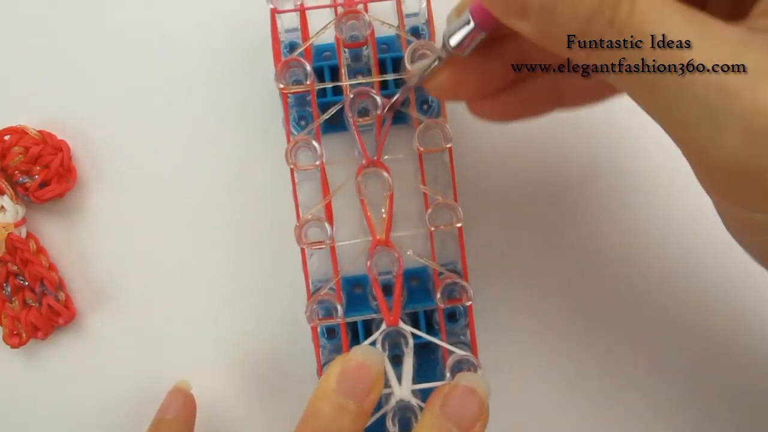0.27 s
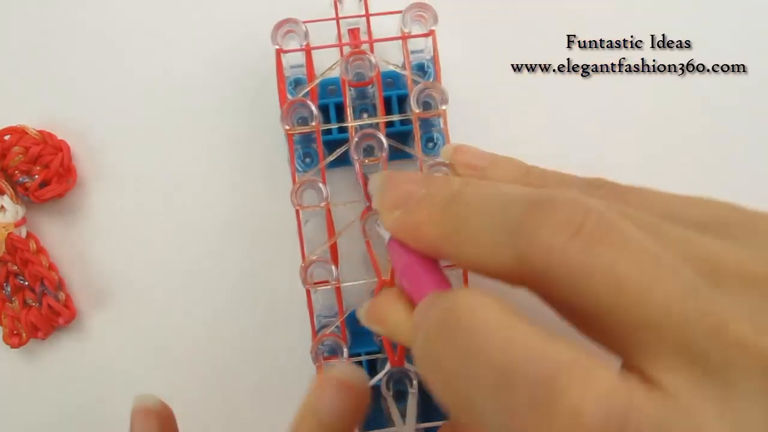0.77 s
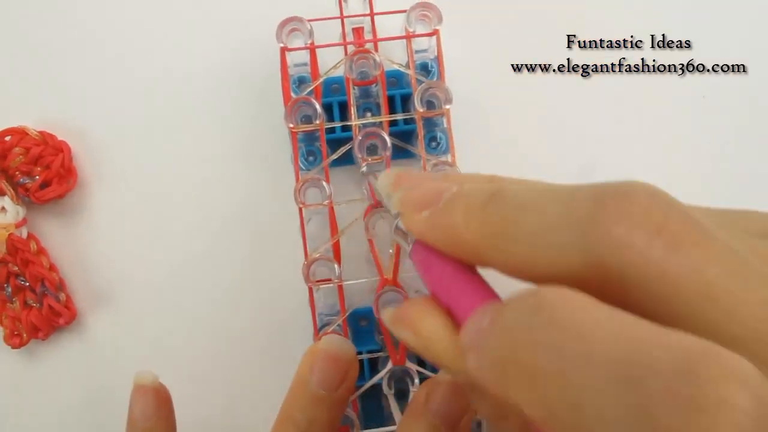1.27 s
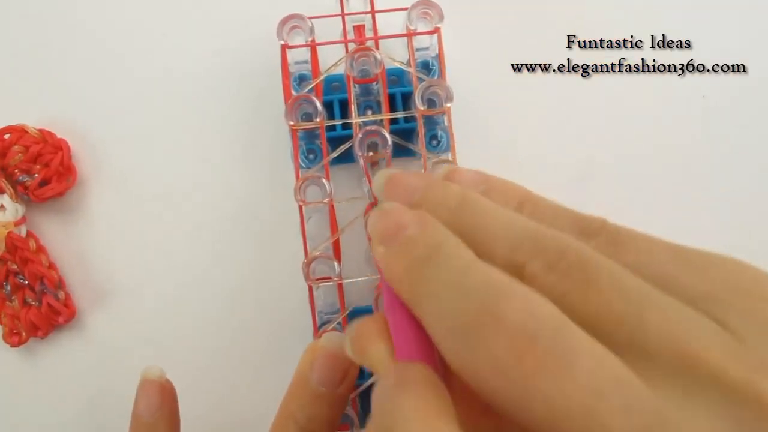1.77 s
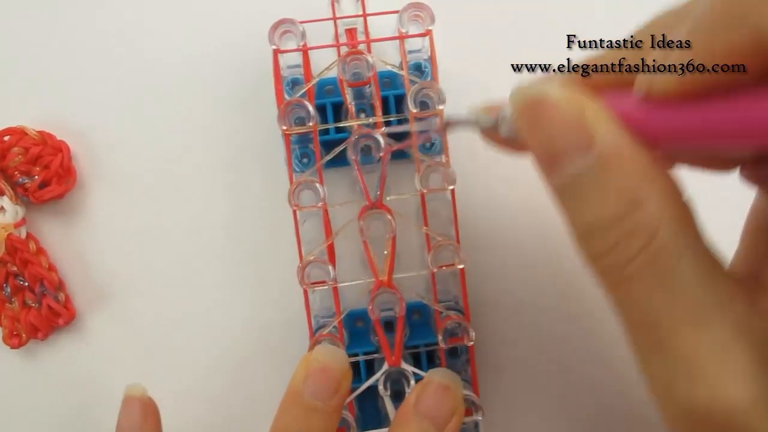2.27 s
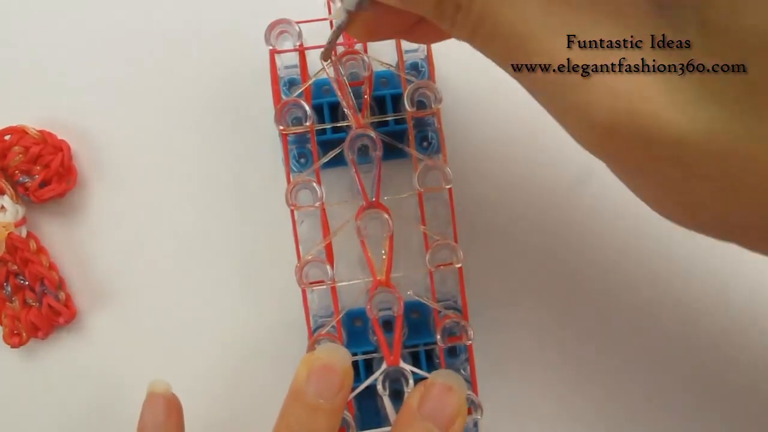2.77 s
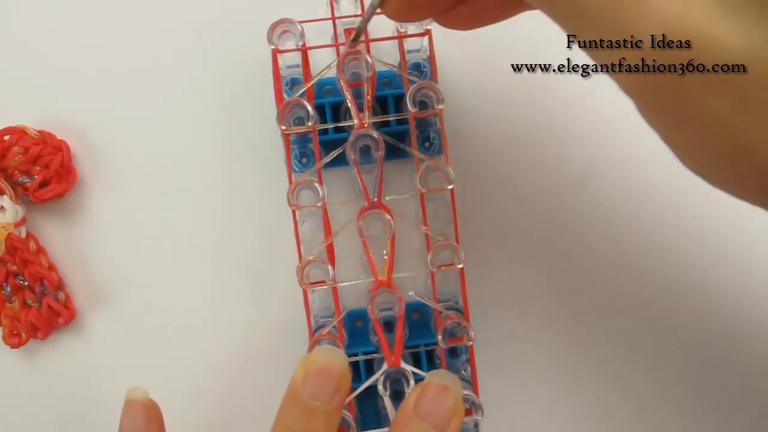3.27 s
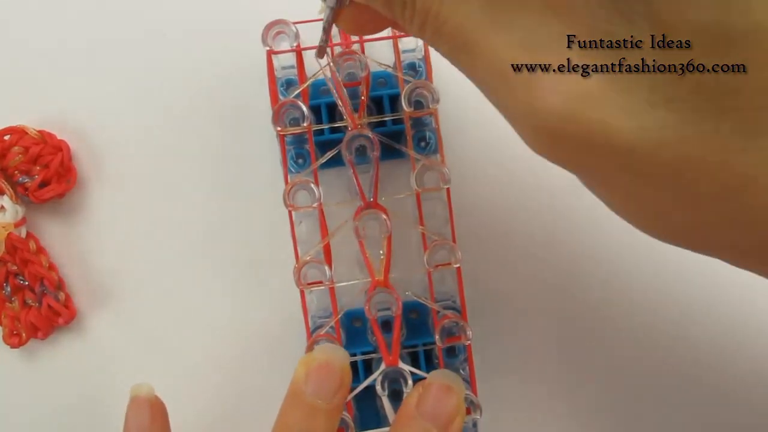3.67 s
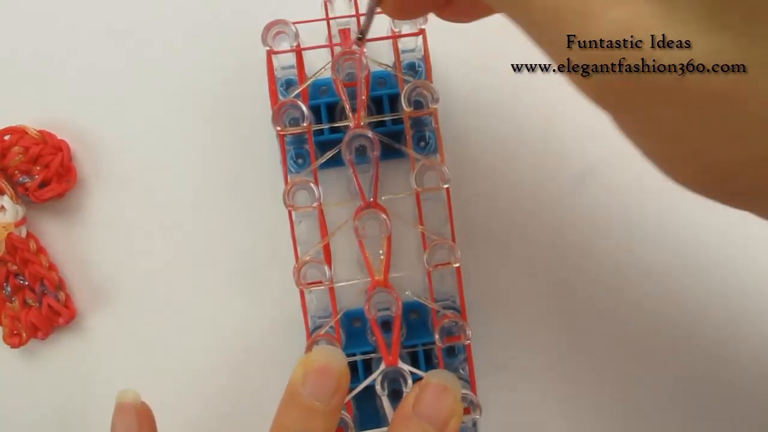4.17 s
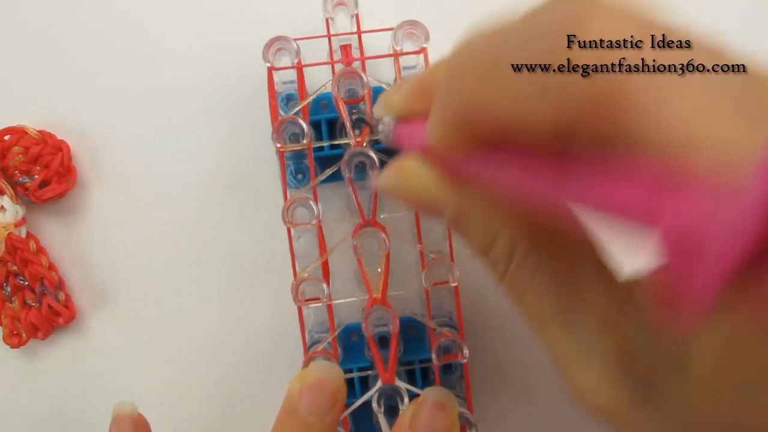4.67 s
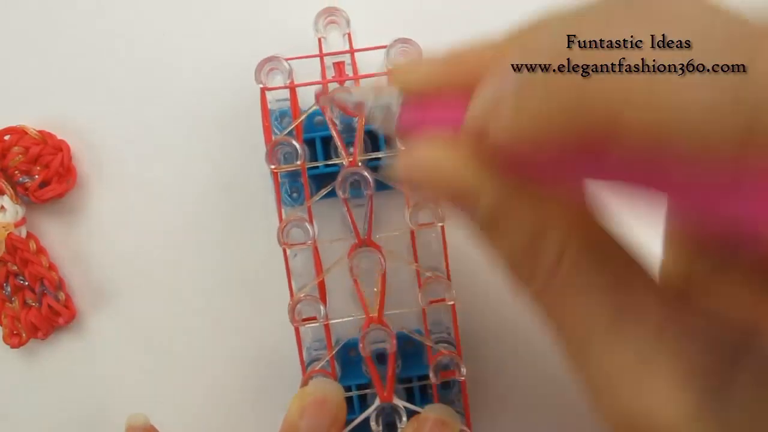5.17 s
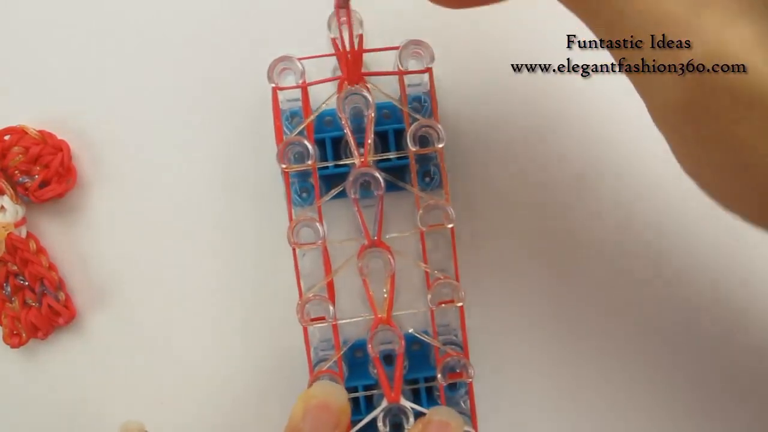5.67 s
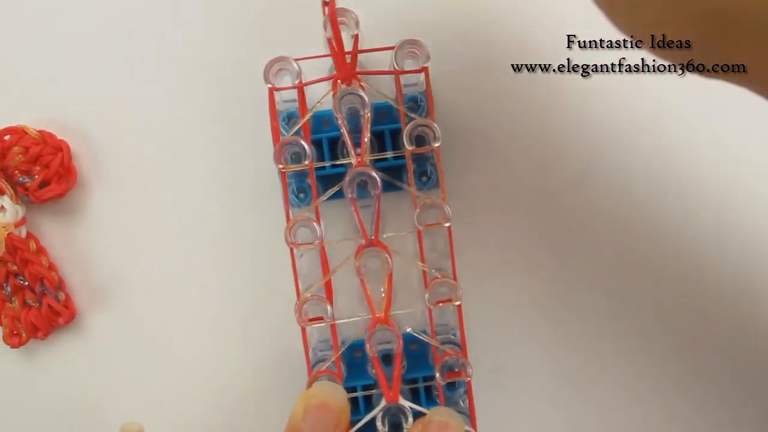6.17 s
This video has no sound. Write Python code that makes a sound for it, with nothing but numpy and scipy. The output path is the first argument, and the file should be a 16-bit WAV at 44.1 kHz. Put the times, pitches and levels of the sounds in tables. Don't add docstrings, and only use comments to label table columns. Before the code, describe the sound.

Sparse plastic clicks, faint rubber rubs and one piercing close tick over a quiet indoor hum, ending with a hard hollow snap.

```python
import sys
import numpy as np
from scipy import signal
from scipy.io import wavfile

SR = 44100
rng = np.random.default_rng(int(sys.argv[2]) if len(sys.argv) > 2 else 0)


def output_pcm(signal):
    pcm = np.clip(np.atleast_2d(signal).T, -1, 1) * 32767
    wavfile.write(sys.argv[1], SR, np.round(pcm).astype(np.int16))


def decibels_to_gain(level_db):
    exponent = np.asarray(level_db, float) / 20
    return 10 ** exponent


N = 283695
T = np.arange(N) / SR

# frequency in Hz, width in Hz, level in dB.
PEG_RINGS = [(2294, 2750, -9.5), (3377, 347, -0.5), (4556, 750, -6), (5100, 950, -1), (5580, 786, -1),
             (7017, 975, 3.5), (7220, 1580, 2), (10630, 4860, -10.5), (14190, 3400, -8)]
TICK_S = 1.0894


def rms_one(x):
    return x / np.sqrt(np.mean(x ** 2) + 1e-20)


def at_hz(points, hz):
    table_hz, values = np.array(points).T
    return np.interp(np.log(hz), np.log(table_hz), values)


def resonate(x, hz, width_hz):
    r = np.exp(-np.pi * width_hz / SR)
    poles = [1, -2 * r * np.cos(2 * np.pi * hz / SR), r * r]
    return signal.lfilter([(1 - r * r) / 2, 0, (r * r - 1) / 2], poles, x)


def butter(x, order, hz, kind="low"):
    return signal.sosfilt(signal.butter(order, hz, kind, fs=SR, output="sos"), x)


def sides(db):
    return decibels_to_gain(np.array([[db / 2], [-db / 2]]))


def add(out, s, sound):
    i = round(s * SR)
    out[..., i:i + sound.shape[-1]] += sound[..., :N - i]


def noise_bands(length):
    white = rng.standard_normal((2, 2, length))
    edges = np.geomspace(16, 17000, 25)
    for k in range(24):
        yield np.sqrt(edges[k] * edges[k + 1]), butter(white[k % 2], 2, edges[k:k + 2], "band")


def stereo(pair, hz):
    # frequency in Hz, left-right likeness from 0 to 1.
    likeness = [(60, 0.84), (180, 0.92), (550, 0.67), (1650, 0.4), (4970, 0.017), (15000, 0.057)]
    # frequency in Hz, left-right difference in dB.
    tilt = [(60, -4), (180, 1.5), (550, 1.5), (1650, 2.5), (4970, 1.5), (15000, -3)]
    alike = np.clip(at_hz(likeness, hz), 0, 1)
    mid = np.sqrt(1 + alike) * pair[0]
    side = np.sqrt(1 - alike) * pair[1]
    return sides(at_hz(tilt, hz)) * (mid + side * [[1], [-1]])


def gain_db(t):
    # start in seconds, depth in dB.
    ducks = [
        (.112, 3),
        (.244, 3),
        (1.091, 34),
        (2.2, 1.5),
        (3.444, 0.76),
        (5.408, 7.5),
        (6.082, 0.95),
    ]
    rest_db, grab_s, settle_s, grab_share, release_s = 1, 0.0085, .05, 0.4, 0.65
    out = rest_db
    for s, depth_db in ducks:
        since = np.maximum(t - s, 0)
        fast = grab_share * np.exp(-since / grab_s)
        slow = (1 - grab_share) * np.exp(-since / settle_s)
        out = out - depth_db * (1 - fast - slow) * np.exp(-since / release_s)
    return out


def ports(x):
    # cavity resonance in Hz, its width in Hz, mesh cutoff in Hz.
    cavities = [(5250, 890, 4600), (7165, 2950, 7670)]
    out = []
    for side, (hz, width_hz, cut_hz) in zip(x, cavities):
        r = np.exp(-np.pi * width_hz / SR)
        poles = [1, -2 * r * np.cos(2 * np.pi * hz / SR), r * r]
        cavity = signal.lfilter([sum(poles)], poles, side)
        out.append(butter(cavity, 2, min(cut_hz, 20000)))
    return np.array(out)


def air():
    # frequency in Hz, density in dB per Hz.
    spectrum = [(15, -31), (22, 0), (56, -5), (72, -16.5), (150, -16.5), (260, -17.5), (446, -27),
                (1060, -30), (2910, -35.5), (5000, -37), (9140, -41.5), (12500, -45.5), (14500, -55.5),
                (16000, -53)]
    # frequency in Hz, rms level in dB, wavering share, left-right in dB.
    hum_lines = [(28.1, -60, .9, -4), (56.8, -59, .9, -4), (119.95, -54, .1, 2), (239.9, -64, .2, 3),
                 (8799.2, -80, .05, -9)]
    air_db = -49
    beat_hz, beat_db, lull_s = 121.98, -58.5, .53
    noise = sum(decibels_to_gain(at_hz(spectrum, hz)) * stereo(pair, hz) for hz, pair in noise_bands(N))
    out = decibels_to_gain(air_db) * rms_one(noise)
    for hz, level_db, share, pan_db in hum_lines:
        waver = rms_one(resonate(rng.standard_normal(N + SR), hz, 3.0)[SR:])
        steady = np.sqrt(2) * np.cos(2 * np.pi * hz * (T - lull_s))
        out += decibels_to_gain(level_db) * (steady + share * waver) * sides(pan_db)
    return out - decibels_to_gain(beat_db) * np.sqrt(2) * np.cos(2 * np.pi * beat_hz * (T - lull_s))


def room(x):
    # frequency in Hz, decay by 60 dB in seconds.
    decay = [(500, 0.93), (1500, 0.074), (3400, .5), (5300, 0.42), (9000, 0.75), (15000, .1)]
    # frequency in Hz, level in dB.
    colour = [(400, -2.5), (1100, -5), (2300, -8.5), (3400, 4), (4200, 0.5), (5200, -3.5), (7500, -2),
              (12000, -10.5)]
    t = np.arange(SR // 2) / SR
    tail = 0
    for hz, pair in noise_bands(len(t)):
        tail = tail + decibels_to_gain(at_hz(colour, hz) - 60 * t / at_hz(decay, hz)) * stereo(pair, hz)
    tail = tail * (1 - np.exp(-t / .004))
    tail = tail / np.sqrt(np.sum(tail ** 2) / 2)
    return signal.fftconvolve(x[None], tail, axes=1)[:, :N]


def tick():
    # frequency in Hz, level in dB, decay by 60 dB in seconds.
    housing = [(3095, -12, .062), (2100, -18, .025), (2126, -30, .19), (3262, -42, .29), (3232, -47, .25),
               (2611, -66, .8), (4480, -37, .07), (5210, -47, .3), (6525, -47, .14)]
    tick_hz, tick_db, width_s, far_db = 3480, -2.5, .00047, -30.5
    out = np.zeros((2, N))
    t = np.arange(SR // 2) / SR - .002
    burst = decibels_to_gain(tick_db) * np.exp(-.5 * (t / width_s) ** 2)
    grit = decibels_to_gain(-29.5) * rng.standard_normal(len(t))
    edge = decibels_to_gain(-27) * np.cos(2 * np.pi * 10500 * t)
    snap = burst * (np.cos(2 * np.pi * tick_hz * t) + grit + edge)
    rise = np.clip(t / .0015, 0, 1) ** 2
    modes = sum(decibels_to_gain(db - 60 * t / t60) * np.sin(2 * np.pi * hz * t) for hz, db, t60 in housing)
    ring = snap + rise * modes
    scatter = rng.standard_normal(300) * np.exp(-np.arange(300) / 410.0)
    far = signal.fftconvolve(ring, scatter)[:len(t)]
    add(out, TICK_S - .002, np.array([ring, decibels_to_gain(far_db) * far / np.abs(far).max()]))
    return out / decibels_to_gain(gain_db(T))


def rubs():
    # time in seconds, level in dB, ring in Hz.
    strokes = [
        [(.26, -34, 4850), (.34, -66, 4980), (.45, -49, 4690), (.61, -53.5, 4670), (.74, -56, 4830),
         (.82, -65, 5100)],
        [(.80, -63, 5120), (.834, -38, 5070), (.85, -43, 5000), (.885, -52.5, 5220), (.91, -49, 5300),
         (.94, -56, 5400), (1.02, -71, 4960), (1.08, -51, 5100)],
        [(4.55, -60, 4800), (4.62, -66, 4550), (4.7, -58.5, 4370), (4.79, -58, 4770), (4.84, -59, 5100),
         (4.9, -68, 5200), (5.02, -60, 5100)],
    ]
    # upper ring in dB, base rumble in dB, share of the gliding ring.
    tones = [(-5, -10.5, 0.65), (-8, -17, .8), (-4.5, -8, 0.95)]
    out = np.zeros((2, N))
    for rows, (upper_db, base_db, share) in zip(strokes, tones):
        s, *columns = np.transpose(rows)
        t = T[(T >= s[0]) & (T < s[-1])]
        level_db, hz = [np.interp(t, s, c) for c in columns]
        noise = rng.standard_normal((3, len(t)))
        strength = decibels_to_gain(2.1 * np.minimum(rng.exponential(1, len(t)), 6))
        clumps = butter(rng.standard_normal(len(t)), 2, 45.)
        grains = (noise[0] + .8 * noise[1:]) * strength * decibels_to_gain(3.0 * rms_one(clumps))
        glide = rms_one(butter(grains, 2, 260)) * np.cos(2 * np.pi * np.cumsum(hz) / SR)
        lower = sum(decibels_to_gain(db) * resonate(grains, f, w) for f, w, db in PEG_RINGS[1:4])
        upper = resonate(resonate(grains, 5600, 2000), 7500, 2400)
        rumble = resonate(noise[0], 533, 34.0) + .4 * resonate(noise[0], 570, 60.)
        peg = rms_one(rms_one(lower) + share * glide) + decibels_to_gain(upper_db + 5) * rms_one(upper)
        fade = np.clip(np.minimum(t - s[0], s[-1] - t) / 0.011, 0, 1)
        level = decibels_to_gain(level_db - gain_db(t)) * fade
        add(out, s[0], level * (decibels_to_gain(-6.5) * peg + decibels_to_gain(base_db) * rms_one(rumble)))
    return out


def blows():
    # start in seconds, peak in dB, struck spot in Hz, swell in seconds.
    jolts = [(.113, -23.5, 850, 0.0083), (.113, -29.5, 1297, .004), (.141, -33, 820, 0.025),
             (.702, -46.5, 517, .0033), (1.144, -61, 1520, 0.0043), (1.362, -64, 678, 0.005),
             (3.442, -47.5, 774, .0073), (5.405, -22.5, 1120, 0.014), (5.468, -43, 1360, 0.024),
             (6.082, -39, 928, .0086), (6.368, -14.5, 730, 0.005)]
    taps = [(.245, -30.5, 520, .016), (0.246, -34, 373, .008), (.243, -31, 1960, .003),
            (.33, -49.5, 533, .03), (0.245, -31.5, 1470, 0.014), (.848, -33, 490, 0.0052),
            (.852, -37, 303, 0.0013), (.972, -39.5, 890, 0.0051), (1.099, -32, 1530, 0.0015),
            (1.149, -47, 1910, 0.00057), (2.197, -30, 1790, 0.0087), (2.204, -31, 910, 0.0127),
            (2.293, -50.5, 1180, 0.021), (2.378, -41.5, 780, 0.0045), (4.292, -35, 1247, 0.0066),
            (6.11, -50.5, 627, 0.023), (6.378, -22.5, 916, 0.013), (6.383, -36, 165, 0.028),
            (6.391, -22, 673, 0.0076)]
    # start in seconds, peak in dB.
    clacks = [
        (.114, -26.5),
        (0.142, -32.5),
        (2.201, -33.5),
        (6.369, -24.5),
    ]
    jolt_fall_db, tap_fall_db = -12, -31.5
    clack_hz, clack_s = 2200, 0.0022
    return ([(*row, jolt_fall_db) for row in jolts]
            + [(*row, tap_fall_db) for row in taps]
            + [(*row, clack_hz, clack_s, tap_fall_db) for row in clacks])


def knocks():
    # frequency in Hz, level in dB.
    base_modes = [(165, -16.5), (290, -16), (370, -8), (533, -0.5), (620, -6), (790, 2.5), (845, -8.5),
                  (1040, 2.5), (1150, -4.5), (1290, -3.5), (1373, -4.5), (1500, -9.5), (1650, -11),
                  (1900, -14.5), (2300, -13)]
    out, t = np.zeros((2, N)), np.arange(12000) / SR
    draws = rng.standard_normal((len(blows()), len(t)))
    for (s, peak_db, hz, swell, fall_db), noise in zip(blows(), draws):
        main = t / swell * np.exp(-t / swell)
        after = 3.9 * swell * (1 - np.exp(-t / swell)) * np.exp(-t / 0.035)
        push = noise * (main + after)
        body = 0
        for f, db in base_modes:
            mode = resonate(resonate(push, f, 38.0 + 0.036 * f), f, 17.0 + .06 * f)
            body = body + decibels_to_gain(db + fall_db * abs(np.log2(f / hz))) * mode
        body = butter(body, 2, [120, 2800], "band")
        body *= decibels_to_gain(peak_db - gain_db(s)) / np.abs(body).max()
        add(out, s - .002, body * sides(4))
    return out


def contacts():
    # start in seconds, peak in dB, brightest ring in Hz, left-right in dB, room in dB.
    snaps = [(.7023, -22, 7600, .6, -19), (0.1124, -7, 4010, 4, -21.5), (0.1397, -10.5, 5143, 3.7, -18),
             (0.9713, -17, 6870, -1, -18.5), (2.1995, -10.5, 4950, 1, -18), (3.4433, -18.5, 5100, 17, -31),
             (6.3706, -7, 5124, 1, -21.5), (2.2151, -10, 4080, 6, -25), (6.0801, -15, 5900, 7, -21),
             (5.4063, -10, 5040, 9, -19), (5.4164, -9.5, 5220, 6, -17), (6.3757, -11.5, 6080, -2.5, -23)]
    rattles = [
        (.2438, -8, 4980, 10.5, -18),
        (0.8477, -25.5, 3620, 6.5, -27),
        (1.0898, -25.5, 5250, 5, -1.1),
        (2.3734, -27.5, 3700, 6.5, -31),
        (4.278, -33.5, 3630, 13, -20),
        (4.2886, -19, 5550, -7.5, -21.5),
    ]
    # start in seconds, peak in dB, brightest ring in Hz, left-right in dB.
    touches = [(0.302, -32, 4930, 1), (0.5776, -35, 4370, 2), (0.579, -34, 7600, 3), (.5985, -39, 3520, 2),
               (1.3635, -52.5, 7440, -6.5), (1.7494, -58, 5300, -0.5), (1.864, -57, 7300, -0.5),
               (1.9803, -50, 3650, 6), (2.7053, -42, 5430, 1), (2.8167, -46.5, 4970, 7),
               (2.8828, -40, 5400, 18.5), (3.2166, -47, 5100, 2.5), (3.4146, -48.5, 5140, 2.5),
               (4.5715, -44, 4290, 6), (4.614, -40.5, 5100, 9), (4.9704, -39.5, 4950, 13.5),
               (4.9824, -40.5, 7460, -11), (4.615, -45.5, 7400, -8), (5.277, -50.5, 5200, 3)]
    slips = [(.2864, -35, 7080, -2), (.4449, -39.5, 3370, 14), (.4853, -39.5, 4730, 7),
             (.5501, -42.5, 2940, -2), (.6469, -35.5, 4820, 8), (.7582, -42, 5350, 14),
             (2.1762, -44.5, 6800, 1), (4.8209, -42.5, 4950, 9)]
    snap_s, rattle_s, touch_s, slip_s = .0011, .0042, .002, .0022
    touch_room_db, slip_room_db = -17.5, -7
    hard_ring_db, soft_ring_db = 0.1, 6
    return ([(*row, snap_s, hard_ring_db) for row in snaps]
            + [(*row, rattle_s, hard_ring_db) for row in rattles]
            + [(*row, touch_room_db, touch_s, soft_ring_db) for row in touches]
            + [(*row, slip_room_db, slip_s, soft_ring_db) for row in slips])


def clicks():
    near, feed = np.zeros((2, N)), np.zeros(N)
    t = np.arange(1400) / SR
    draws = rng.standard_normal((len(contacts()), 3, len(t)))
    spike = signal.unit_impulse(200)
    for (s, peak_db, hz, pan_db, room_db, length, ring_db), noise in zip(contacts(), draws):
        onset = 1 - np.exp(-(t / 0.00041) ** 2)
        rattle = np.exp(-t / max(length, 2e-4))
        trail = decibels_to_gain(min(room_db, -17) + 9) * np.exp(-t / 0.01)
        force = (noise[0] + 0.45 * noise[1:]) * onset * (rattle + trail)
        force[:, 30] += 4.2
        peg = sum((-1) ** k * decibels_to_gain(db) * resonate(force, f, w) for k, (f, w, db) in enumerate(PEG_RINGS))
        ring = peg + decibels_to_gain(ring_db) * resonate(force, hz, 230)
        ring = butter(ring, 4, np.clip(.6 * hz, 2400, 3600), "high")
        level = decibels_to_gain(peak_db + 3.5 - gain_db(s))
        add(near, s - .0005, level * ring / np.abs(ports(ring)).max() * sides(pan_db - 4.0))
        sent = spike + decibels_to_gain(17) * resonate(spike, hz, 1000)
        add(feed, s, level * decibels_to_gain(room_db + 1.0) * sent)
    return near, feed


def scene():
    near, feed = clicks()
    base, close = knocks(), tick()
    tick_start = close[0] * (T < TICK_S + .003)
    wet = room(decibels_to_gain(2.5) * feed + decibels_to_gain(-12) * base.mean(axis=0) + decibels_to_gain(-25.5) * tick_start)
    return ports(near + base + rubs() + wet) + close + air()


def roll_off(x):
    return signal.sosfilt(signal.butter(12, 16480, fs=SR, output="sos"), x)


def record(dry):
    mix = dry * decibels_to_gain(gain_db(T))
    return roll_off(mix)


dry = scene()
out = record(dry)
output_pcm(out)
```